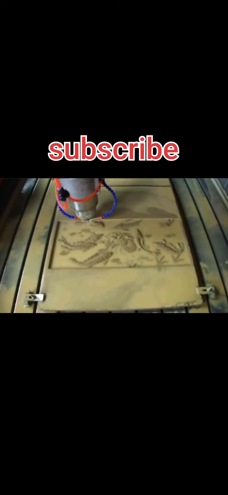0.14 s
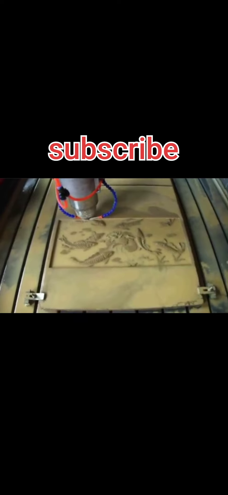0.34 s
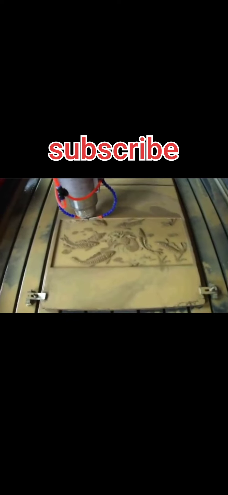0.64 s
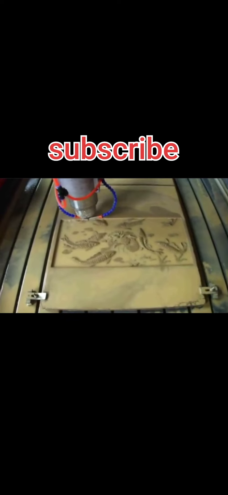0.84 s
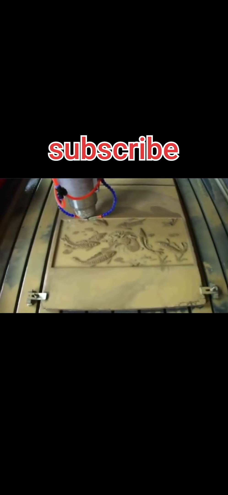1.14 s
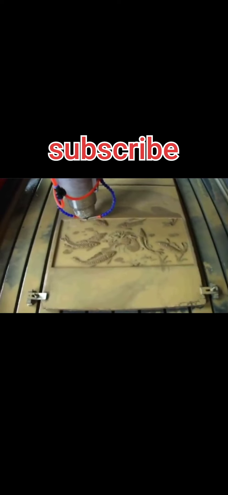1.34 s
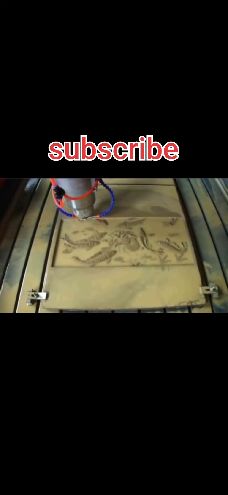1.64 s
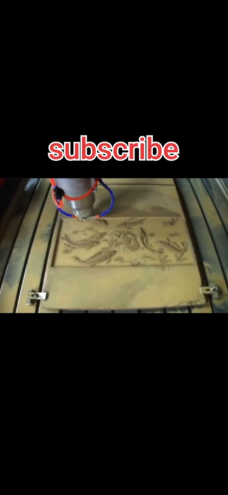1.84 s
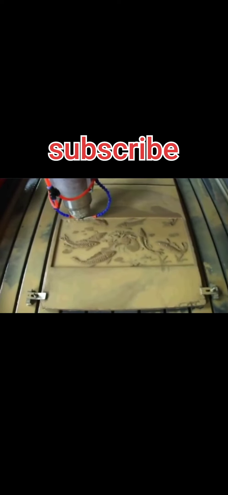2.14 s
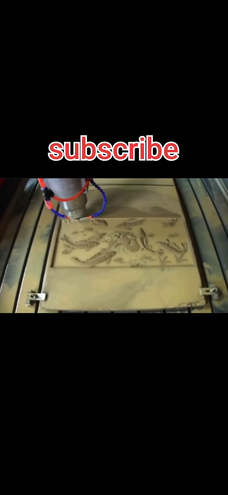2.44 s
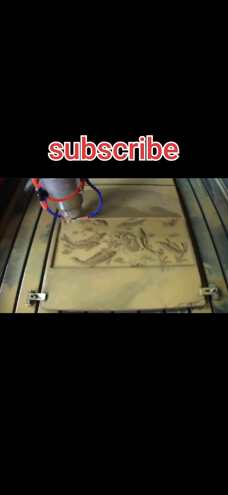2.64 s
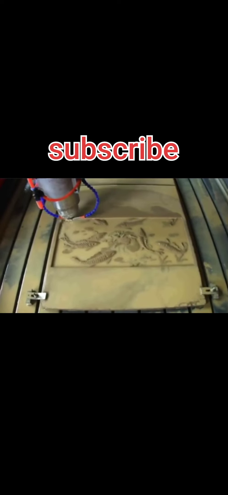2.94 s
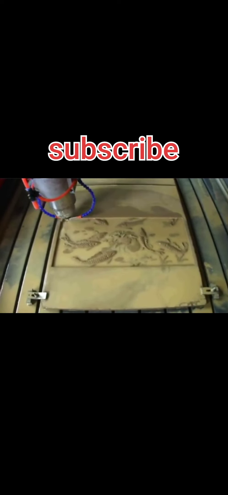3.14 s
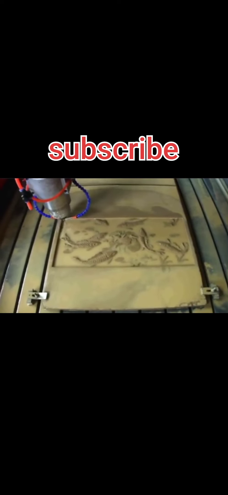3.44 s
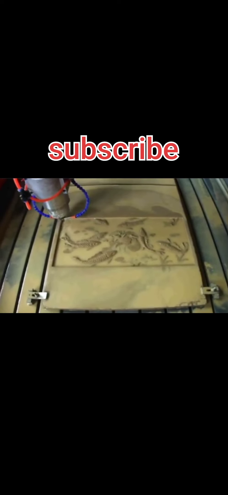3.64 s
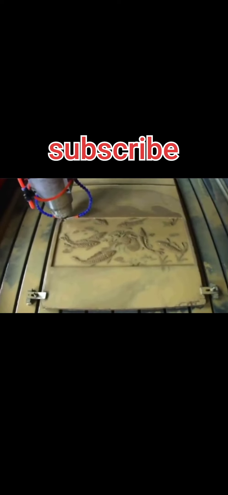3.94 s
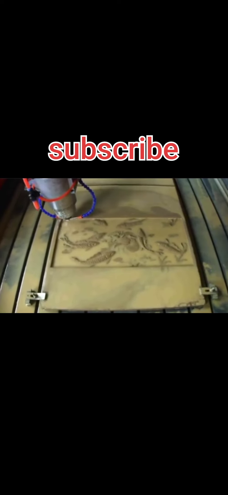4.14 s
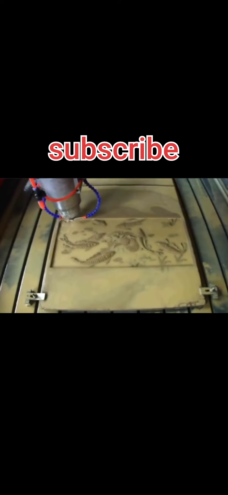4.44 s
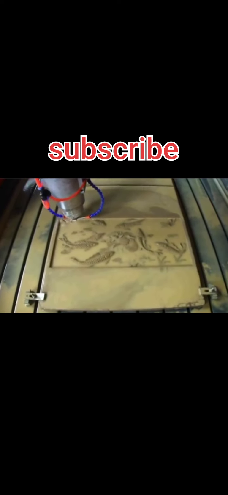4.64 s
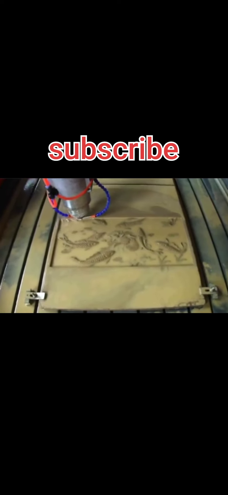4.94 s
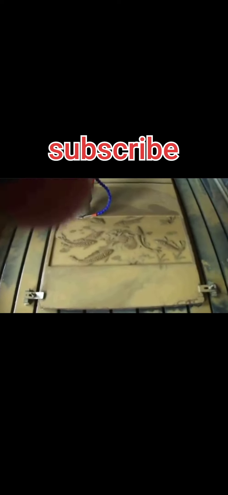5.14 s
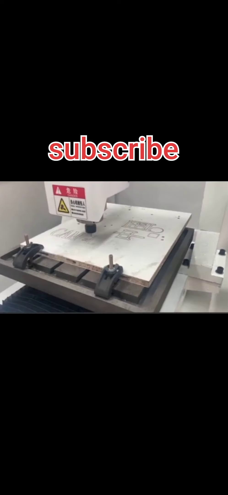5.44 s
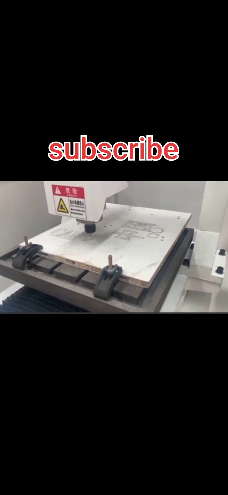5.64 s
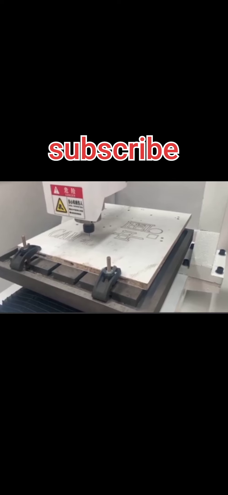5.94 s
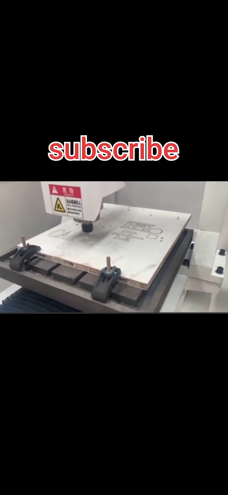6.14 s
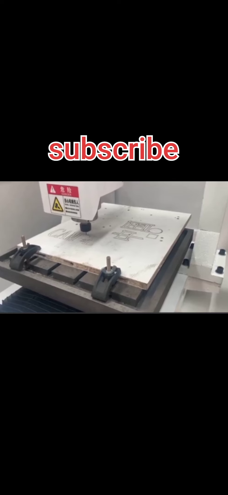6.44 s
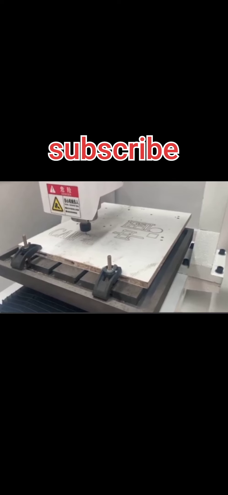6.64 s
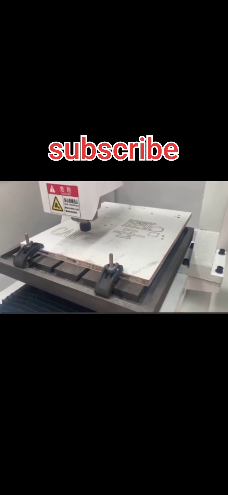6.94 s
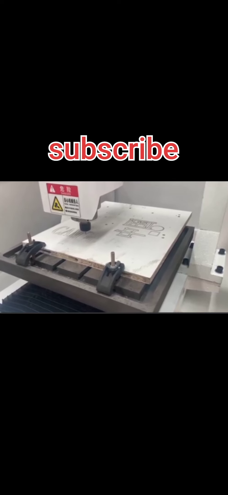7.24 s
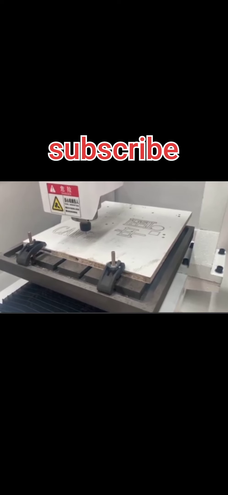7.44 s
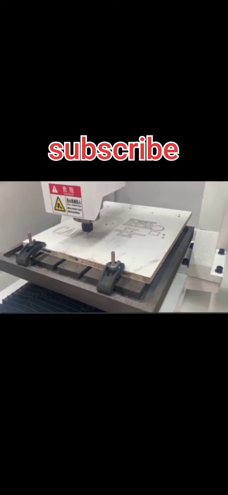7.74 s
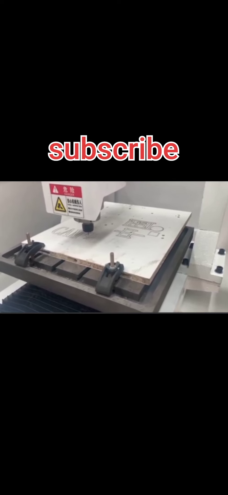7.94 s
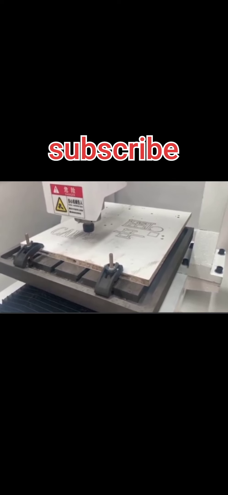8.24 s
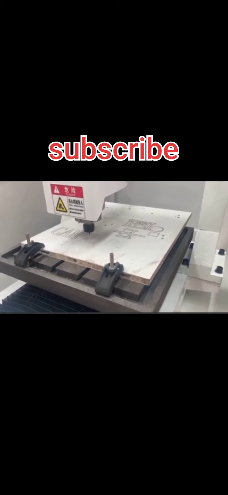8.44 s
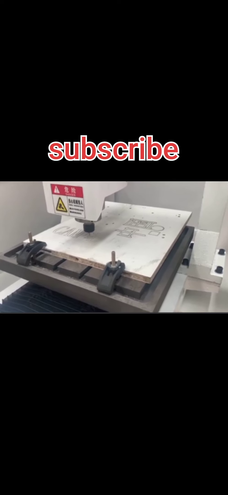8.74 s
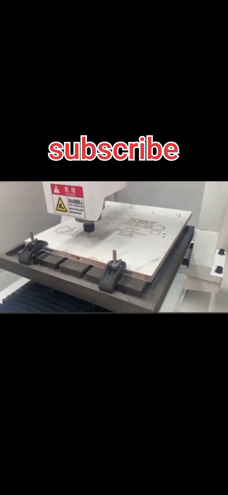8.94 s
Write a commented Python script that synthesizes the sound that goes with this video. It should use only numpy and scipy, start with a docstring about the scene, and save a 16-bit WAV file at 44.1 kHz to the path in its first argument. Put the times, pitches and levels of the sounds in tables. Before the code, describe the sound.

A router carves wood in a workshop, heard close: a loud, steady, buzzy whine around 400 and 800 Hz with gritty chip noise, flickering tool chatter and a fizzy edge. After about five seconds a hard edit drops to a far quieter small engraver: bright rushing air hiss, thin motor hum and soft low hand thuds. The first phone sounds duller on top; both are mono.

```python
"""In a workshop, a router spindle carves a wooden board: its whine is a stack of sines at multiples of the shaft speed.
Cutting noise, shaped from random noise, rings in the tool, the gantry and the bed.
An edit then fades to a small engraver, much quieter: an air jet hisses, made of uneven filtered noise,
over a motor hum of swelling sines and the low thuds of a hand, which are short sine pushes.
Two phones are heard one after the other; the first keeps a narrower band."""
import sys
import numpy as np
from scipy import signal
from scipy.fft import rfft, irfft, next_fast_len
from scipy.io import wavfile
from scipy.ndimage import uniform_filter1d, map_coordinates

SR = 44100
rng = np.random.default_rng(int(sys.argv[2]) if len(sys.argv) > 2 else 0)


def persist_wave(psi):
    """Save psi, clipped to +-1, as 16-bit WAV."""
    counts = np.round(np.clip(psi, -1, 1) * 32767).astype(np.int16)
    wavfile.write(sys.argv[1], SR, np.atleast_2d(counts).T)


N = 401310
T = np.arange(N) / SR  # time of every sample, s

# An "order" is a multiple of the shaft speed.
# Lowest router orders: (t/s, order 1 level/dB, order 2 level/dB, order 3 level/dB)
LOW_ORDERS = [(0.0, -30, -29.5, -32), (0.3, -30.5, -30.5, -32.5), (0.55, -29, -23.5, -36),
              (0.85, -26, -25, -30), (1.2, -28, -22, -26.5), (1.6, -25.5, -29.5, -34.5),
              (1.85, -25.5, -26, -30), (2.1, -27, -21.5, -31.5), (2.6, -28.0, -23, -36),
              (2.95, -29, -23, -30.5), (3.2, -27.5, -29, -31.5), (3.4, -33, -25, -30.5),
              (3.7, -26.5, -27, -37.5), (4.05, -26, -24.0, -37.5), (4.6, -27, -22, -33),
              (4.95, -27.5, -21, -40), (5.27, -23.5, -25, -34)]
# Orders that swell and fade at regular periods, like two close tones beating: (order)
SWELLING_ORDERS = [4, 6, 7, 8]
# Their swells, in the same sequence: (level/dB before the swell, depth 0-1, period/s, loudest t/s)
ORDER_SWELLS = [(-34, 0.2, 0.715, 1.415), (-37, .62, 4.4, 3.75), (-41, 0.9, 4.8, 3), (-36, .45, 3.06, 1.2)]
# Weaker orders, wandering around a steady level: (order, level/dB)
WEAK_ORDERS = [(5, -41), (9, -51), (12, -48), (14, -53), (16, -52)]
# Cutting over time, chips before CHIPS_DB is added:
# (t/s, chips level/dB, tool chatter level/dB, fizz level/dB, bed level/dB, gantry level/dB)
CUTTING = [(0.0, -30, -33, -28.0, -38, -25), (0.3, -27.5, -24, -29.5, -33.0, -29),
           (0.6, -27.5, -26.0, -29, -34, -27), (0.9, -26.5, -25.5, -31, -35, -28),
           (1.2, -28, -24, -29, -33.5, -25), (1.55, -27, -24, -28, -36.5, -27.5),
           (1.85, -25, -24.5, -31.5, -34.5, -26), (2.2, -28.0, -34.5, -29.5, -40.5, -31),
           (2.5, -27, -37, -29, -36, -29), (2.85, -25, -25.5, -27, -36, -29),
           (3.15, -29, -30, -24.5, -38, -31), (3.4, -28.5, -29, -26.5, -39.5, -32),
           (3.65, -26, -25, -25.5, -37, -29.5), (4.05, -27.5, -36, -25.5, -34.5, -27),
           (4.4, -28.5, -28.5, -26.5, -38.0, -26), (4.75, -28.5, -24.0, -28, -41, -28),
           (5.0, -29.5, -26, -33, -36.0, -27.5), (5.27, -26, -27, -31, -33.5, -27.5)]
# Colour of the chip noise: (f/Hz, relative level/dB)
CHIP_COLOUR = [(260, -40.5), (440, -13), (473, -17.5), (726, -13), (799, -5.5), (955, -14.5), (1210, -9.5),
               (1320, -19), (1580, -9), (1840, -18), (2450, -10.5), (2660, -19.5), (2860, -13.5),
               (3420, -15.5), (7600, -19.5), (9880, -49.5), (16700, -120)]
# The tool's first mode moves with its depth in the wood: (t/s, f/Hz)
TOOL_PITCH = [(0.0, 2506), (1.6, 2495), (2.8, 2440), (3.8, 2450), (5.29, 2490)]
# Tool resonances: (ratio to the first mode, width/Hz, level/dB relative to the chatter)
TOOL_RINGS = [(1., 125, -2), (1.003, 45, -3), (1.155, 110, -5.5)]
# Resonances of the fizz: (f/Hz, width/Hz, relative level/dB)
FIZZ_RINGS = [(6360, 350, 2.5), (6670, 500, 4), (7220, 850, 2)]
# Resonances of the gantry: (f/Hz, width/Hz, relative level/dB)
GANTRY_RINGS = [(394.4, 63, 3), (664, 78, 0.5), (790, 54, -3.5), (850, 7.7, -12), (1185, 61, -6),
                (1543, 170, -5.5), (1994, 230, -6), (2300, 470, -13.5), (3232, 100, 0), (3960, 440, -10),
                (4400, 60, -6)]
# Colour of the bed's drone: (f/Hz, relative level/dB)
BED_COLOUR = [(32, -64.5), (55, -33.5), (73, -19.5), (102, -7.5), (173, -8.5), (238, -0.5), (334, -1.5),
              (350, -5), (460, -34), (770, -120)]
# The hand shifts on the first phone: (t/s, length/s, level/dB)
HAND_SHIFTS = [(.05, .1, -56), (.8, 0.13, -65), (1.28, 0.079, -63), (3.199, 0.092, -54),
               (5.212, 0.095, -65)]
# Colour of the air jet: (f/Hz, relative level/dB)
JET_COLOUR = [(1500, -90), (3500, -42), (4500, -15.5), (5500, -16), (6000, -11), (6500, -18.5), (7150, -9),
              (7350, -20), (7750, -17), (8100, -1), (9260, -3), (10000, -0.5), (12700, -1), (14100, 1),
              (15800, 0.5)]
# The cabin rings with the air jet: (f/Hz, width/Hz, relative level/dB)
CABIN_RINGS = [(4130, 130, -10), (4510, 50, -7), (4860, 90, -7), (5180, 35, -9), (5340, 36, -10),
               (6410, 220, -2), (6820, 110, -2), (7100, 90, -1), (7570, 130, 1)]
# Colour of the engraver's case: (f/Hz, relative level/dB)
CASE_COLOUR = [(140, -40), (230, -11), (260, -7), (323, -18), (397, -2), (427, -6.5), (477, -8.5),
               (579, -8), (638, -13), (678, -11.5), (814, -8.5), (844, -12), (1100, -11.5), (1670, -16.5),
               (4200, -13), (5460, -38), (9240, -120)]
# Narrow bands where the feed motors sing: (f/Hz, width/Hz, relative level/dB)
FEED_RINGS = [(690, 30, 0), (1125, 40, -3), (1400, 50, -8)]
# Tones of the engraver's motor: (f/Hz)
HUM_PITCHES = [199.3, 398.4, 552, 597.5, 797, 1123]
# Their swells, in the same sequence: (level/dB before the swell, depth 0-1, period/s, loudest t/s)
HUM_SWELLS = [(-55, 0.23, 2, 6.9), (-57, 0, 0.64, 5.7), (-66.5, 1, 1.9, 6.8), (-63, 0.8, 4, 7.5),
              (-64.5, 0.3, 1.2, 7.45), (-66, 0.4, 2.5, 5.8)]
# Faint tones, wandering around a steady level: (f/Hz, level/dB)
FAINT_TONES = [(1028, -70), (1195, -69), (7978, -59), (8177, -59)]
# The hand on the second phone: (t/s, rumble level/dB)
HAND_RUMBLE = [(5.35, -45), (5.63, -46), (6.55, -46.5), (6.89, -49), (7.31, -47.5), (7.71, -46.5),
               (9.1, -48.5)]
# Colour of that rumble: (f/Hz, relative level/dB)
HAND_COLOUR = [(15, -39), (25, -15), (97, -1.5), (135, -4), (198, -5.5), (250, -18), (320, -24),
               (550, -120)]
# Thuds of the hand: (t/s, level/dB of the pulse outline, f/Hz)
HAND_THUDS = [(5.94, -30.5, 80), (6.311, -31.5, 90), (7.5, -35, 70), (7.63, -32.5, 80), (7.91, -40, 60),
              (8.25, -30.5, 70)]

SPEED_HZ = 399.6  # shaft turns per second
FLICKER_DB, FLICKER_PER_S = 1.5, 11  # each layer's level flickers at random, on its own
CHIPS_DB = 4.5  # added to the chip level
JET_DB, CASE_DB = -26.5, -45.5
EDIT_S, FADE_S = 5.287, 0.015  # middle and length of the fade
NARROW_HZ, TOP_HZ = 7615, 15770  # upper limits: first phone, everything


def router():
    """The whole router: the spinning shaft, the cut, and the parts that ring with it."""
    chip_db, tool_db, fizz_db, bed_db, gantry_db = curves(CUTTING)
    airborne = shaft_whine() + chip_noise(chip_db) + tool_chatter(tool_db)
    airborne = airborne + fizz(fizz_db) + gantry(gantry_db) + bed(bed_db)
    # the microphone drops deep bass
    airborne = filtered(airborne, lambda hz: 1 / np.sqrt(1 + (62 / (hz + 1)) ** 8))
    return airborne + shifting_hand()


def shaft_whine():
    """A turning shaft repeats its push each turn, so it sounds at multiples of its speed."""
    turn = 2 * np.pi * SPEED_HZ * T
    whine = np.zeros(N)
    for order, db in enumerate(curves(LOW_ORDERS), start=1):
        whine += amp(db) * tone(order * turn, drift=0.29, flutter_db=1.03)
    for order, row in zip(SWELLING_ORDERS, ORDER_SWELLS):
        level = swell(*row) * amp(2.65 * wobble(4.914))
        whine += level * tone(order * turn, drift=0.45, flutter_db=2.5)
    for order, db in WEAK_ORDERS:
        level = amp(db + 3 * wobble(3))
        whine += level * tone(int(round(order)) * turn, drift=0.74, flutter_db=5.5)
    return whine


def chip_noise(db):
    """The broad noise of breaking chips, uneven in level."""
    noise = filtered(uneven_noise(2.2, tall=3, wide=10, sink_db=5), shape(CHIP_COLOUR))
    return amp(db + CHIPS_DB + 0.58 * wobble(FLICKER_PER_S)) * unit(noise)


def tool_chatter(db):
    """The tool rings in bands of noise that glide with its depth in the wood."""
    first_hz, = curves(TOOL_PITCH)
    ringing = np.zeros(N)
    for ratio, width_hz, relative_db in TOOL_RINGS:
        ringing += amp(db + relative_db) * gliding(ratio * first_hz, width_hz)
    return amp(FLICKER_DB * wobble(FLICKER_PER_S)) * ringing


def fizz(db):
    """High resonances turn uneven noise into a fizz whose level flickers at random."""
    noise = filtered(uneven_noise(4.1, tall=8.2, wide=3.7), modes(FIZZ_RINGS))
    return amp(db + FLICKER_DB * wobble(FLICKER_PER_S)) * unit(noise)


def gantry(db):
    """The gantry rings at its own resonances, made from uneven noise."""
    return amp(db) * unit(filtered(uneven_noise(2.0), modes(GANTRY_RINGS)))


def bed(db):
    """The bed drones: low noise whose level flickers at random."""
    noise = filtered(rng.standard_normal(N), shape(BED_COLOUR))
    return amp(db + FLICKER_DB * wobble(FLICKER_PER_S)) * unit(noise)


def shifting_hand():
    """The hand shifts on the first phone: short swells of rumble around 45 Hz."""
    grip = sum(amp(db) * np.exp(-((T - s) / length) ** 2) for s, length, db in HAND_SHIFTS)
    return grip * unit(filtered(rng.standard_normal(N), modes([(45, 40, 0)])))


def engraver():
    """The whole engraver: air jet and cabin, case, motors, and the hand holding the phone."""
    gust = amp(JET_DB + 0.3 * wobble(1.52) + 0.31 * wobble(12))
    return air_jet(gust) + cabin(gust) + case() + feed_motors() + motor_hum() + holding_hand()


def air_jet(gust):
    """Rushing air hisses: uneven bright noise, rippled by near walls."""
    hiss = filtered(uneven_noise(1.6, tall=3.7, wide=5.3), shape(JET_COLOUR))
    return gust * unit(walls(hiss))


def cabin(gust):
    """The cabin rings at its resonances, rising and falling with the jet, 18 dB below it."""
    return amp(-18) * gust * unit(filtered(uneven_noise(2.5), modes(CABIN_RINGS)))


def case():
    """The case sounds as noise in its own colour, uneven in level."""
    noise = filtered(uneven_noise(2.6, tall=2, wide=10, sink_db=3), shape(CASE_COLOUR))
    return amp(CASE_DB + 0.26 * wobble(1.404)) * unit(noise)


def feed_motors():
    """The feed motors sing in narrow bands of uneven noise."""
    return amp(-58 + 1.0 * wobble(3.66)) * unit(filtered(uneven_noise(4.5), modes(FEED_RINGS)))


def motor_hum():
    """The motor hums in swelling tones, with a few faint tones beside them."""
    hum = np.zeros(N)
    for hz, row in zip(HUM_PITCHES, HUM_SWELLS):
        level = swell(*row) * amp(1.6 * wobble(4))
        hum += level * tone(2 * np.pi * hz * T, drift=0.52, flutter_db=3.5)
    for hz, db in FAINT_TONES:
        level = amp(db + 3.6 * wobble(2.83))
        hum += level * tone(2 * np.pi * hz * T, drift=0.52, flutter_db=3.5)
    return hum


def holding_hand():
    """The hand on the second phone rumbles unevenly and thuds softly."""
    rumble_db, = curves(HAND_RUMBLE)
    rumble = filtered(rng.standard_normal(N), shape(HAND_COLOUR))
    hand = amp(rumble_db) * unit(amp(2.7 * wobble(22)) * rumble)
    for s, db, hz in HAND_THUDS:  # a soft push: about one low cycle
        outline = amp(db) * np.exp(-((T - s) * hz * 1.46) ** 2)
        hand = hand + outline * np.sin(2 * np.pi * hz * (T - s))
    return hand


def walls(x):
    """Near reflections cut a fixed fine ripple into the spectrum."""
    t = np.arange(SR // 4) / SR
    tail = rng.standard_normal(len(t)) * amp(-60 * t / 0.2)  # falls 60 dB in 0.2 s
    return x + 0.35 * signal.fftconvolve(x, tail / np.linalg.norm(tail))[:N]


def tone(phase, drift, flutter_db):
    """A sine of rms about 1 whose phase (radians) and level wander a little."""
    wandering = phase + drift * wobble(14) + rng.uniform(0, 2 * np.pi)
    return np.sqrt(2) * amp(flutter_db * wobble(25)) * np.sin(wandering)


def swell(db, depth, period, loudest):
    """A gain that rises and falls like two close tones beating."""
    turning = np.exp(2j * np.pi * (T - loudest) / period)
    return amp(db) * np.abs(1 + np.clip(depth, 0, 1) * turning)


def uneven_noise(uneven_db, tall=2, wide=16, sink_db=0):
    """White noise with a random gain over frequency and time; sink_db lowers the weak parts further."""
    z = signal.stft(rng.standard_normal(N), nperseg=1024)[2]
    field = rng.standard_normal(z.shape)
    field = uniform_filter1d(field, max(int(tall), 1), 0)  # smooth over frequency
    field = unit(uniform_filter1d(field, max(int(wide), 1), 1))  # smooth over time
    gain_db = uneven_db * field - sink_db * np.minimum(field, 0) ** 2
    return signal.istft(z * amp(gain_db), nperseg=1024)[1][:N]


def gliding(hz, width_hz):
    """Noise of rms 1 in a resonance whose centre follows hz."""
    slow = filtered(rng.standard_normal((2, N)), modes([(0, width_hz, 0)]))
    phase = 2 * np.pi * np.cumsum(hz) / SR
    return unit(slow[0] * np.cos(phase) + slow[1] * np.sin(phase))


def wobble(rate):
    """A smooth random curve with this many random points a second."""
    coarse = np.arange(0, N + 64, 64)
    knots = rng.standard_normal(int(N * rate / SR) + 4)
    smooth = map_coordinates(knots, [coarse * rate / SR])
    return np.interp(np.arange(N), coarse, smooth)


def curves(rows):
    """One value per sample for each column after the time."""
    s, *cols = np.transpose(rows)
    return [np.interp(T, s, c) for c in cols]


def filtered(x, response):
    """x with every frequency scaled by the response."""
    m = next_fast_len(N + 8192)
    return irfft(rfft(x, m) * response(np.fft.rfftfreq(m, 1 / SR)), m)[..., :N]


def shape(points):
    """A gain drawn through (f/Hz, level/dB) points on a log frequency axis."""
    f, db = np.transpose(points)
    return lambda hz: amp(np.interp(np.log(hz + 1), np.log(f + 1), db))


def modes(table):
    """The gain of resonances whose powers add."""
    return lambda hz: np.sqrt(sum(amp(2 * db) / (1 + (2 * (hz - c) / w) ** 2) ** 2 for c, w, db in table))


def below(top_hz):
    """A steep low-pass that closes over the 50 Hz under top_hz."""
    return lambda hz: np.sin(np.pi / 2 * np.clip((top_hz - hz) / 50, 0, 1)) ** 2


def amp(db):
    """Decibels to a plain gain."""
    return 10 ** (np.asarray(db) / 20)


def unit(x):
    """x scaled to an rms of 1."""
    return x / np.sqrt(np.mean(x ** 2) + 1e-20)


def scene():
    """The edit cross-fades from one machine to the other; both phones have one microphone."""
    late = np.clip((T - EDIT_S) / FADE_S + 0.5, 0, 1)
    first = filtered(router(), below(NARROW_HZ)) * np.cos(late * np.pi / 2)
    second = engraver() * np.sin(late * np.pi / 2) ** 2
    mono = first + second
    return np.array([mono, mono])


def record(dry):
    """Nothing is kept above the band limit."""
    return filtered(dry, below(TOP_HZ))


dry = scene()
out = record(dry)
persist_wave(out)
```